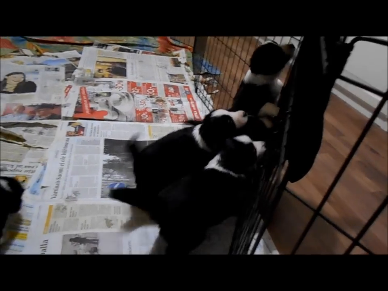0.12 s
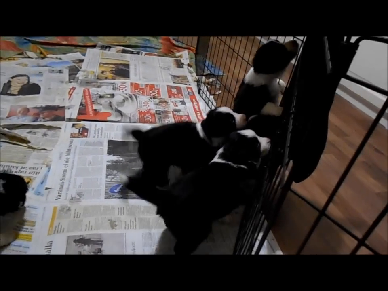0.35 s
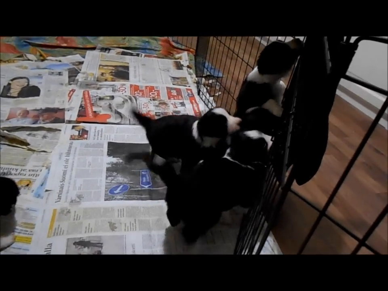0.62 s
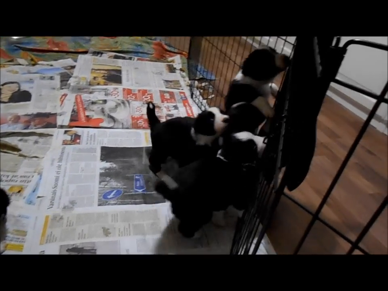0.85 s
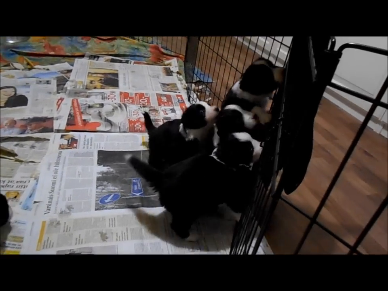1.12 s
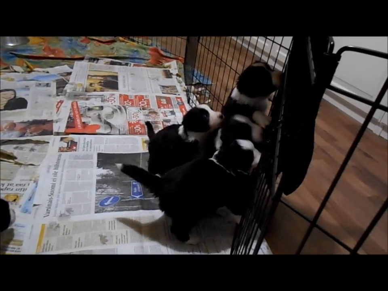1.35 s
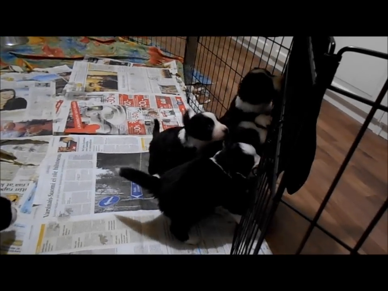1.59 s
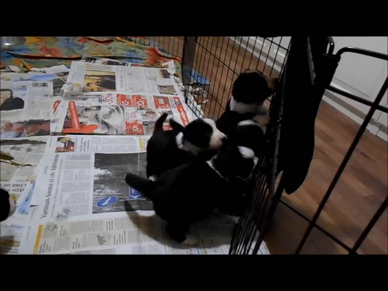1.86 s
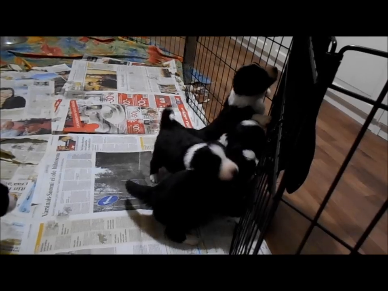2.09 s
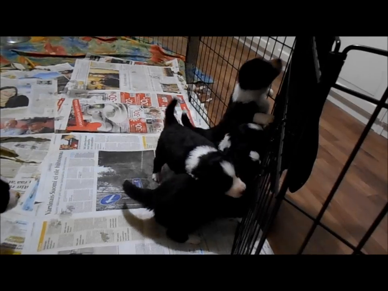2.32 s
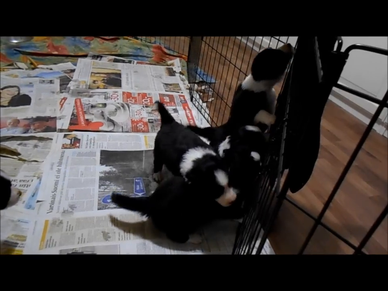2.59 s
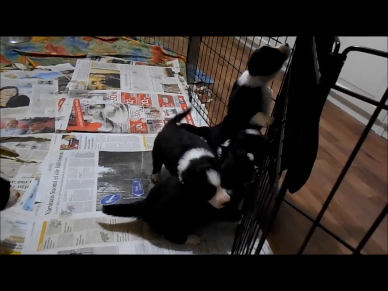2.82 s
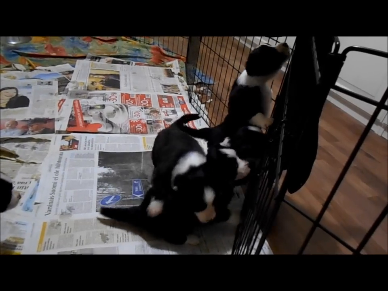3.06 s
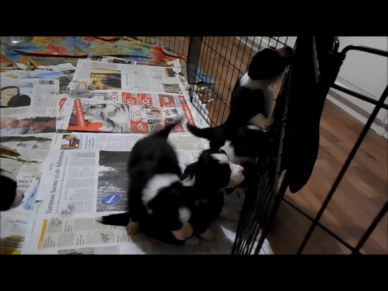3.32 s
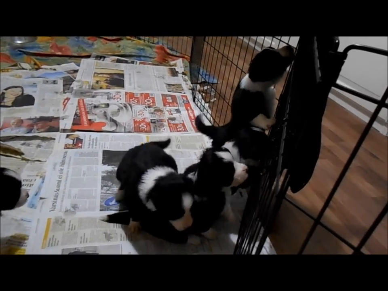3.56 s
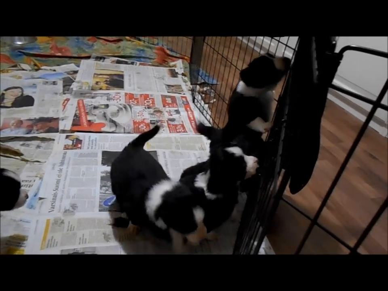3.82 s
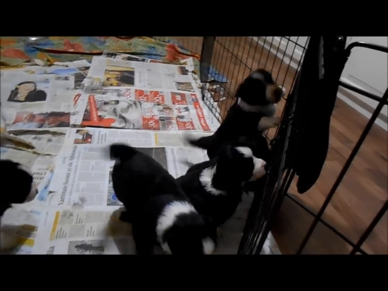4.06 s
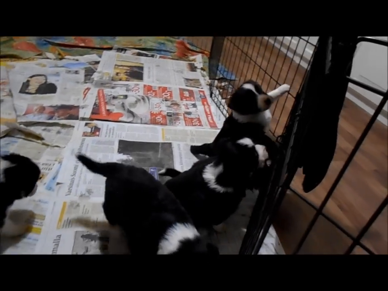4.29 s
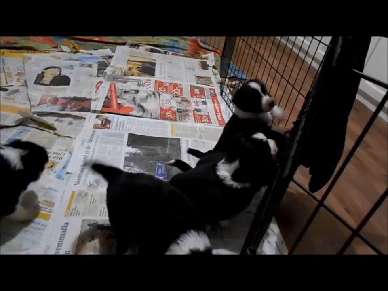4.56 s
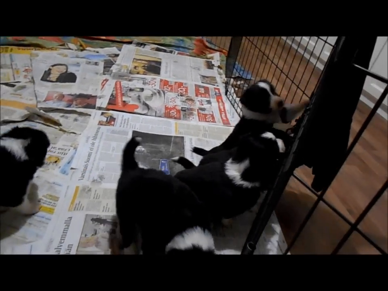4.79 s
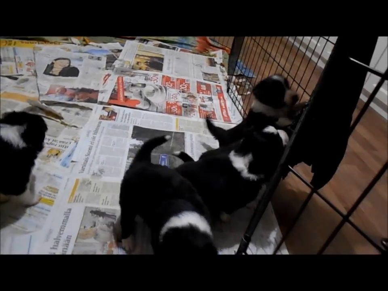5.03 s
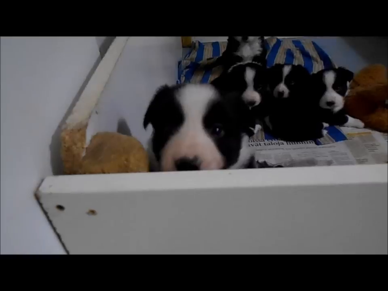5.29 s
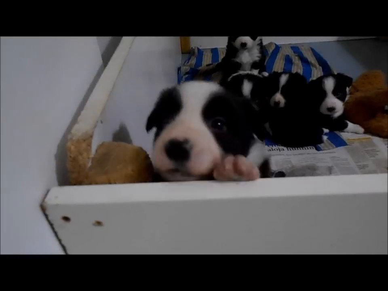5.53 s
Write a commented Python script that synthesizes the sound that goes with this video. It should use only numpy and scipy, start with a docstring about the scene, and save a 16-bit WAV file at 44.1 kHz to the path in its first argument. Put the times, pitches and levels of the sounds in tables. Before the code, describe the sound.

Several young puppies scramble on newspaper in a bare, reverberant pen. Sharp crackles and scuffs dominate first, with a tiny yelp at the start and a small nose puff near two seconds. Around three seconds come loud high yelps, then softer rising whines amid more paper snaps. A tiny silent gap follows, then a close, drier puppy squeal in a quieter room, cut off at its loudest.

```python
"""Paws crackle, snap and scuff newspaper in a bare, echoing pen, then puppies whine and yelp in it.
After a cut with a moment of silence, one puppy squeals close by from a wooden box in a quieter room.
Voices are overtones on a shaky pitch plus breath, coloured by throat and mouth; short squeaks and
grunts are plain sine chirps. Paper is shaped noise: single bursts for snaps, clumps of tiny creases
for dragging. Rooms are fading noise tails, and steady noise lies underneath."""
import sys
import numpy as np
from scipy import signal
from scipy.fft import rfft, irfft, next_fast_len
from scipy.io import wavfile
from scipy.ndimage import map_coordinates

SR = 44100
rng = np.random.default_rng(int(sys.argv[2]) if len(sys.argv) > 2 else 0)


def invert_db(x):
    """Field ratio 10**(x/20) for x, a level in decibels (scalar or array-like)."""
    u = np.asarray(x, float) / 20
    return 10 ** u


def to_wav(s):
    """Save 16-bit WAV."""
    ch = np.atleast_2d(s).T  # columns
    pcm = np.round(np.clip(ch, -1, 1) * 32767)  # PCM
    wavfile.write(sys.argv[1], SR, pcm.astype(np.int16))


N = 249165  # length in samples

# Whines and yelps in the pen, one list a call.
# Each row: time in seconds, pitch in Hz, effort in dB before the throat and mouth act, mouth opening 0-1.
YELP_CALLS = [
    [(0, 921, -36.5, 0.49), (.03, 932, -37, 0.27), (.07, 802, -45.5, 0.36)],
    [(2.803, 829, -41.5, 0.22), (2.83, 841, -35.5, 0.39), (2.86, 1152, -30.5, 0.59), (2.9, 1080, -49, 0.4)],
    [(3.03, 695, -35, 0.55), (3.04, 720, -26.5, 0.18), (3.062, 975, -31.5, 0.38), (3.085, 1124, -35.5, 1),
     (3.105, 1101, -15, 0.81), (3.12, 1201, -13, 0.78), (3.16, 1217, -18.5, 0.79), (3.18, 1149, -18.5, .8),
     (3.2, 1160, -17.5, .8), (3.222, 1293, -23, 0.79), (3.24, 1420, -13.5, 0.4), (3.265, 1300, -48, .4)],
    [(3.39, 762, -28, 0.96), (3.41, 818, -26.5, 0.76), (3.424, 1031, -10.5, 0.97), (3.455, 1083, -12, 0.98),
     (3.472, 1042, -28.5, .99), (3.488, 1004, -20.5, 1), (3.503, 975, -25.5, 0.86), (3.52, 994, -36, 0.86)],
    [(3.662, 521, -46, .8), (3.68, 702, -33, 0.44), (3.72, 700, -68, 0.9)],
    [(3.87, 654, -40, 0.03), (3.89, 621.7, -35.5, 0.37), (3.92, 762, -26.5, 0.12), (3.96, 949, -42.5, 0.43),
     (4.0, 1043, -32.5, 0.35), (4.045, 965, -40, 0.48), (4.07, 974, -28, 0.5), (4.125, 942.5, -41, 0.49),
     (4.15, 1046, -33.5, 1), (4.2, 998, -66, 0.4), (4.24, 1040, -29, 0.2)],
    [(4.378, 558, -39, 0.39), (4.4, 568, -44.5, 0.67), (4.42, 711, -28, 0.14), (4.445, 743, -27.5, 0.22),
     (4.46, 858, -31.5, 0.81), (4.48, 916, -32.5, 0.67), (4.52, 928, -35, 0.4), (4.55, 870, -40, 0.6)],
    [(4.718, 341, -45.5, 0), (4.74, 447.5, -50.5, 0.4), (4.765, 512, -37, 0.01), (4.78, 643, -34.5, 0.15),
     (4.8, 719.7, -30, 0.08), (4.85, 702.2, -32.5, 0.13), (4.92, 716, -56, 0), (4.97, 724, -43, .1)],
    [(5.093, 632, -36.5, 0.1), (5.12, 663, -33, 0.07), (5.135, 776, -33.5, 0.77), (5.15, 924, -43.5, 0.2),
     (5.2, 983, -31.5, 0.38), (5.222, 975, -37, 0.1)],
]
# Squeals from the box, one list a call. Each row: the same four columns as the yelps.
SQUEAL_CALLS = [
    [(5.255, 1605, -32, 0.5), (5.29, 1460, -29, 0.2), (5.32, 1461, -26, 0.2), (5.366, 1379, -25.5, 0.33)],
    [(5.496, 1354, -24.5, 0.27), (5.515, 1381, -17, 0.65), (5.54, 1476, -17.5, 0.84), (5.555, 1658, -19, 1),
     (5.58, 1660, -11, 1), (5.61, 1577, -14, 0.87), (5.63, 1600, -14.5, 1), (5.651, 1590, -5, 1)],
]
# Throat colour with the mouth wide open. Each row: frequency in Hz, gain in dB.
PEN_THROAT_COLOUR = [(600, 0.5), (1100, -1.5), (1400, -4), (1900, 0), (2300, -4), (3100, -11), (4300, 0.5),
                     (5200, -1.5), (5900, -15), (6500, -5.5), (8000, -6), (9500, -14.5)]
BOX_THROAT_COLOUR = [(1700, 0), (2900, -36), (3250, -14), (4400, -5), (4800, -24.5), (5500, -13),
                     (6400, -11), (7500, -22), (9000, -13.5), (11000, -31)]
# What a closed mouth holds back. Each row: frequency in Hz, loss in dB.
PEN_LIP_LOSS = [(1000, -0.5), (2050, 7.5), (2400, 39), (3700, 23), (9500, 23.5)]
BOX_LIP_LOSS = [(1700, -1), (4400, 27), (5600, 9), (9000, -4)]
# The mouth's resonance, which climbs as it opens.
# The row: closed frequency in Hz, open frequency in Hz, height in dB, width in octaves.
PEN_MOUTH_PEAK = (750, 3570, 10.2, 0.44)
BOX_MOUTH_PEAK = (2100, 5000, 5.2, 0.23)
# Thin falling squeaks. Each row: start in seconds, first pitch in Hz, last pitch in Hz,
# length in seconds, peak level in dB.
FALLING_SQUEAKS = [(2.863, 10400, 9300, 0.018, -30.5), (3.24, 10500, 9250, 0.022, -15)]
# Low grunts. Each row: start in seconds, pitch in Hz, length in seconds, peak level in dB.
LOW_GRUNTS = [(.215, 588, 0.0082, -36.5), (0.717, 290, 0.014, -46), (4.937, 287, 0.032, -47.5)]
# A puff through the nose. The row: time in seconds, level in dB, rough half length in seconds.
SNORT_PUFF = (2.075, -17.5, 0.0035)
# Nose resonances. Each row: centre in Hz, width in Hz, level in dB.
NOSE_MODES = [(3500, 660, -1), (5560, 2900, -10), (7760, 1400, -8)]
# Paper snaps and scuffs. Each row: start in seconds, peak before the room in dB,
# rise in milliseconds, room answer in dB.
PAPER_SNAPS = [(0.0142, -20.5, 1.2, 5.5), (0.2372, -10.5, .86, 9.5), (.2626, -25, 5.1, -9),
               (0.3392, -9.5, 0.22, 0.5), (0.3678, -10.5, 1.1, 6), (0.411, -18, .22, 3),
               (0.4518, -9, 0.29, 11), (0.514, -10, .27, 7.5), (.5644, -10.5, 2.2, -19),
               (0.583, -13, 0.14, -3), (0.6328, 2, 0.11, -10), (0.7303, -21.5, 2.9, 0.5),
               (0.855, -12.5, 0.39, 0), (1.074, -7.5, 0.18, 4.5), (1.172, -2.5, 0.28, 6.5),
               (1.346, -10, 0.23, 4.5), (1.7535, -25, .14, 8.5), (1.896, -7.5, .52, 5),
               (2.0096, -30, 0.19, -8), (2.0468, -7, 0.27, -2.5), (2.3578, -19.5, 0.42, 11),
               (2.8165, -20.5, 0.93, 9.5), (3.378, -9, 1.2, -2.5), (3.7447, -16.5, .4, 10.5),
               (3.901, -17.5, 5.2, -8), (4.0412, -21.5, 2.2, 7.5), (4.0818, -9.5, 0.55, 6.5),
               (4.1436, -9.5, 4.9, 0.5), (4.1565, 5, .36, -23), (4.1706, -19, 2.4, -13), (4.807, -12, 1, 0),
               (4.9708, -26, 0.56, 0), (4.9942, -0.5, .32, -7), (5.0268, -9, .5, 2.5),
               (5.0483, -13.5, 0.83, 3), (5.058, -18, 2.1, -14), (5.0757, -9, 1.3, 0.5),
               (5.086, -13, 0.34, -31), (5.121, -11.5, 4.7, -8.5)]
# Paws dragging paper. Each row: time in seconds, level in dB.
SHUFFLE_LEVEL = [(0, -42), (.17, -40.5), (.3, -32.5), (.56, -37), (.8, -50.5), (.87, -38), (.96, -46.5),
                 (1.3, -46), (1.54, -56.5), (1.96, -42.5), (2.25, -57.5), (2.5, -51), (2.9, -42.5),
                 (2.97, -49), (3.3, -37.5), (3.4, -34), (3.6, -50), (4.26, -37.5), (4.93, -52), (5.04, -51),
                 (5.215, -40.5)]
# Colour of the dragged paper. Each row: frequency in Hz, gain in dB.
PAPER_COLOUR = [(60, -54), (500, -4), (1900, -3), (7700, -0.5), (11000, -3.5)]
# How long each room rings. Each row: frequency in Hz, time to fall by 60 dB in seconds.
PEN_RINGING = [(300, 0.39), (1000, 0.51), (3000, 0.4), (6000, 0.29), (10000, 0.33)]
BOX_RINGING = [(1400, 0.88), (3000, 0.76), (10000, 0.18)]
# Floor and near walls around the pen. Each row: delay in seconds, echo level in dB
# (each echo varies by about 1 dB; snaps add their own room answer).
NEAR_WALLS = [(.0046, -6), (.012, -8.5), (.019, -16)]
# Colour of the steady room noise. Each row: frequency in Hz, relative level in dB per Hz.
PEN_AIR_COLOUR = [(15, -33), (30, -7.5), (300, -9.5), (10000, -11)]
BOX_AIR_COLOUR = [(20, -12), (100, -30), (700, -39), (1800, -40), (3600, -40.5), (5000, -37), (8700, -25),
                  (11000, -49)]
# Silence between the two scenes. The row: start in seconds, end in seconds.
SILENCE = (5.2215, 5.2635)

PEN_AIR_DB, BOX_AIR_DB = -53, -50  # average noise levels
SNAP_HZ, SCUFF_DULLS = 7000, 0.13  # typical centre at a 1 ms rise; slower rises sound duller
SNAP_SPREAD = 0.12  # random spread of the centre, as a fraction
SHEET_LOW_HZ = 1300  # a thin sheet radiates little below this
TOP_HZ = 10500  # where the camera's band limit starts


def unit(x):
    """Scales x to an average (rms) level of 1."""
    return x / np.sqrt(np.mean(x ** 2) + 1e-20)


def along(points, hz):
    """Reads (Hz, value) points at any frequency, on a log axis."""
    f, v = np.transpose(points)
    return np.interp(np.log(hz + 1), np.log(f + 1), v)


def wobble(rate, size):
    """A smooth random curve with rate random knots a second."""
    knots = rng.standard_normal(int(size * rate / SR) + 4)
    return map_coordinates(knots, [np.arange(size) * rate / SR])


def filtered(x, response):
    """Multiplies the spectrum of x by a response that depends on frequency."""
    m = next_fast_len(len(x) + 8192)
    return irfft(rfft(x, m) * response(np.fft.rfftfreq(m, 1 / SR)), m)[:len(x)]


def resonances(modes):
    """Response of ringing modes (Hz, width in Hz, dB), summed with alternating signs."""
    def response(f):
        total = 0
        for k, (centre, width, db) in enumerate(modes):
            mode = 1j * f * width / (centre * centre - f * f + 1j * f * width)
            total = total + (-1) ** k * invert_db(db) * mode
        return total
    return response


def add(out, s, x):
    """Mixes x into out from time s in seconds."""
    spot = out[round(s * SR):][:len(x)]
    spot += x[:len(spot)]


def echoing(x, room, wet_db, gap, walls=()):
    """Adds echoes off near walls and a fading noise tail, at wet_db, that starts gap seconds late."""
    hz, t, z = signal.stft(rng.standard_normal(SR * 3 // 4), SR, nperseg=256)
    fading = z * invert_db(-60 * t / along(room, hz)[:, None])
    tail = signal.istft(fading, SR, nperseg=256)[1]
    tail = np.pad(invert_db(wet_db) * tail / np.linalg.norm(tail), (round(gap * SR), 0))
    tail[0] = 1  # the direct sound
    for s, db in walls:
        tail[round(s * SR)] += invert_db(db + rng.normal(0, 1))
    return signal.fftconvolve(x, tail)


def cry(rows, throat, lips, cavity, slope_db, jitter, flutter_db, breath_db, breath_hz, colour_hz, fade):
    """Folds vibrate nearly evenly: fluttering overtones on one shaky pitch, breath hissing once a cycle."""
    s, *cols = np.transpose(rows)
    t = np.arange(s[0], s[-1], 1 / SR)
    hz, effort_db, mouth = [np.interp(t, s, c) for c in cols]
    shaky_hz = hz * (1 + jitter * wobble(108.7, size=len(t)))
    phase = 2 * np.pi * np.cumsum(shaky_hz) / SR
    k = np.arange(1, 13)[:, None]  # overtone numbers
    closed_hz, open_hz, height_db, octaves = cavity
    mouth = np.clip(mouth, 0, 1)
    peak_hz = closed_hz * (open_hz / closed_hz) ** mouth

    def lift_db(f):
        """The mouth's resonance as a bump around its present centre."""
        return height_db * np.exp(-.5 * (np.log2(f / peak_hz) / octaves) ** 2)

    def level_db(f):
        """The throat colours the effort; the lips hold back more the less they open."""
        coloured_db = effort_db + along(throat, f) - (1 - mouth) * along(lips, f)
        return coloured_db + lift_db(f) - lift_db(hz)

    flutter = flutter_db * np.sqrt(k) * np.array([wobble(52.6, size=len(t)) for _ in k])
    strength = invert_db(level_db(k * hz) - slope_db * np.log2(k) + flutter)
    audible = k * hz < SR / 4
    tone = (strength * audible * np.sin(k * phase)).sum(0)
    # breath lies above breath_hz and follows the voice's colour at colour_hz
    noise = rng.standard_normal(len(t))
    hiss = unit(filtered(noise, lambda f: 1 / (1 + (breath_hz / (f + 1)) ** 8)))
    breath = invert_db(level_db(colour_hz) + breath_db) * (1 + np.cos(phase)) * hiss
    edge = np.clip(np.minimum(t - s[0], s[-1] - t) / fade, 0, 1)  # fade in and out, seconds
    return edge * (np.sqrt(2) * tone + breath)


def pen_voices():
    """Yelping voices and short sine squeaks and grunts, each with its own fresh room tail."""
    out = np.zeros(N)
    for rows in YELP_CALLS:
        voice = cry(rows, PEN_THROAT_COLOUR, PEN_LIP_LOSS, PEN_MOUTH_PEAK, slope_db=5.0, jitter=0.0072,
                    flutter_db=2.15, breath_db=-19, breath_hz=2190, colour_hz=5240, fade=0.0057)
        voice = invert_db(-1.5) * voice
        add(out, rows[0][0], echoing(voice, PEN_RINGING, wet_db=2.0, gap=.006, walls=NEAR_WALLS))
    steady_grunts = [(s, hz, hz, length, db) for s, hz, length, db in LOW_GRUNTS]
    for s, start_hz, end_hz, length, db in list(FALLING_SQUEAKS) + steady_grunts:
        size = round(length * SR)
        chirp = np.sin(2 * np.pi * np.cumsum(np.linspace(start_hz, end_hz, size)) / SR)
        swell = invert_db(db) * np.hanning(size)
        add(out, s, echoing(swell * chirp, PEN_RINGING, wet_db=0.0, gap=0.0059))
    return out


def box_voice():
    """The near puppy's squeals: the same kind of voice, mostly direct sound with a faint room tail."""
    out = np.zeros(N)
    for rows in SQUEAL_CALLS:
        voice = cry(rows, BOX_THROAT_COLOUR, BOX_LIP_LOSS, BOX_MOUTH_PEAK, slope_db=0.9, jitter=0.0023,
                    flutter_db=0.7, breath_db=-2, breath_hz=7300, colour_hz=9000, fade=0.0037)
        add(out, rows[0][0], echoing(voice, BOX_RINGING, wet_db=-17.5, gap=.008))
    return out


def snaps():
    """Each snap or scuff is a sharp broad noise burst around its own pitch, with its own room answer."""
    out, t = np.zeros(N), np.arange(SR // 20) / SR
    for s, db, rise_ms, wet_db in PAPER_SNAPS:
        hz = SNAP_HZ * rise_ms ** -SCUFF_DULLS * np.exp(SNAP_SPREAD * rng.standard_normal())
        u = t * 1000 / rise_ms
        swell = u * np.exp(-u)
        tearing = swell * rng.standard_normal(len(t))
        # the fibre that gives way first makes one clean tick at the top of the burst
        tearing[np.argmax(swell)] += 1.8 / np.sqrt(rise_ms)
        sheet = resonances([(hz, 2.88 * hz, 0)])
        burst = filtered(tearing, lambda f: (sheet(f) * f / (f - 1j * SHEET_LOW_HZ)) ** 2)
        burst = invert_db(db) * burst / np.abs(burst).max()
        walls = [(delay, echo_db + wet_db) for delay, echo_db in NEAR_WALLS]
        add(out, s, echoing(burst, PEN_RINGING, wet_db=wet_db, gap=.006, walls=walls))
    return out


def shuffle():
    """Dragged paper: clumps of tiny uneven creases over a hiss, and the muffled tread of paws."""
    rub = .7 * rng.standard_normal(N)
    for hz in (3000, 5500, 9000):
        chance = rng.random((2, N))
        happens = chance[0] < 500 / SR * invert_db(7 * wobble(40, size=N))  # clumped in time
        size = invert_db(13 * chance[1] ** 3)  # mostly small, a few large
        creases = happens * size * rng.standard_normal(N)
        ringing = unit(filtered(creases, resonances([(hz, 0.88 * hz, 0)])))
        rub += ringing * np.sqrt(hz / 9000)
    rub = unit(filtered(rub, lambda hz: invert_db(along(PAPER_COLOUR, hz))))
    thud = unit(filtered(rng.standard_normal(N), resonances([(119, 220, 0)])))
    tread = invert_db(-27.5 + 3.8 * wobble(8.6, size=N)) * thud
    s, db = np.transpose(SHUFFLE_LEVEL)
    effort = invert_db(np.interp(np.arange(N) / SR, s, db))
    return echoing(rub * effort, PEN_RINGING, wet_db=1.0, gap=.005)[:N] + tread * effort


def snort():
    """A quick noisy puff coloured by the nose's resonances."""
    s, db, half = SNORT_PUFF
    t = np.arange(-4 * half, 4 * half, 1 / SR)
    noise = unit(filtered(rng.standard_normal(len(t)), resonances(NOSE_MODES)))
    puff = noise * np.exp(-.5 * (t / half * 1.03) ** 2)
    out = np.zeros(N)
    add(out, s - 4 * half, echoing(invert_db(db) * puff, PEN_RINGING, wet_db=-7.5, gap=0.0025))
    return out


def air(colour, db):
    """Steady room noise: coloured random noise whose level drifts slightly."""
    noise = unit(filtered(rng.standard_normal(N), lambda hz: invert_db(along(colour, hz))))
    return invert_db(db + 0.3 * wobble(4.86, size=N)) * noise


def draining_offset():
    """An electrical offset that drains away after the cut, with a 0.13 s time constant."""
    t = np.arange(N) / SR
    return invert_db(-31.5) * np.exp(-np.abs(t - SILENCE[1]) / 0.13)


def scene():
    """The pen, a silent cut, then the box."""
    t = np.arange(N) / SR
    pen = pen_voices() + snaps() + shuffle() + snort() + air(PEN_AIR_COLOUR, PEN_AIR_DB)
    box = box_voice() + air(BOX_AIR_COLOUR, BOX_AIR_DB) + draining_offset()
    return (pen * (t < SILENCE[0]) + box * (t > SILENCE[1]))[None]


def low_pass(x):
    """Removes everything above the highest recorded frequency."""
    return signal.sosfilt(signal.butter(12, 11530, fs=SR, output="sos"), x)


def record(dry):
    """Loud peaks clip softly, a little sooner on the upswing; the camera cuts what lies above its band."""
    top = np.where(dry > 0, .86, .95)
    clipped = dry / (1 + np.abs(dry / top) ** 8) ** (1 / 8)
    # 1 dB lost for every 20 Hz above the limit, down to -55 dB
    band = filtered(clipped[0], lambda hz: invert_db(-np.clip((hz - TOP_HZ) / 20, 0, 55)))
    return low_pass(band[None])


dry = scene()
out = record(dry)
to_wav(out)
```